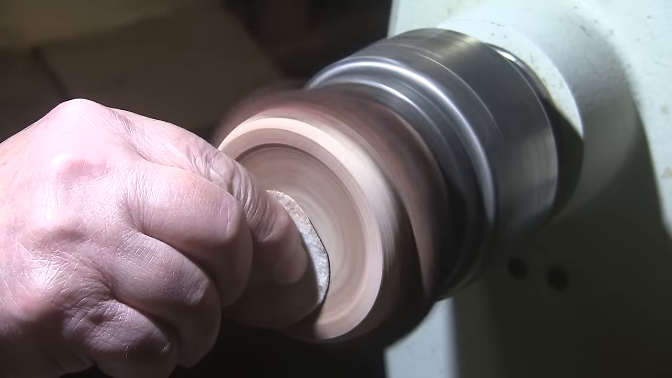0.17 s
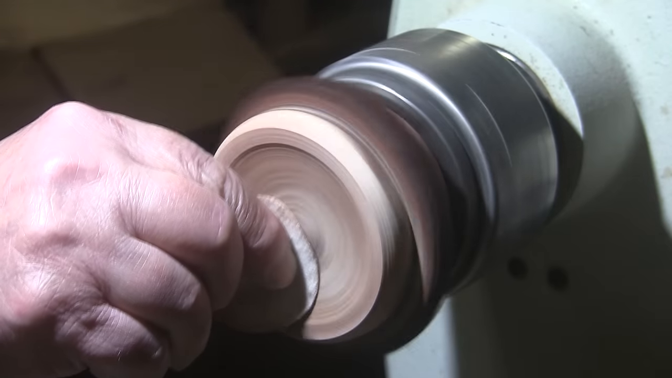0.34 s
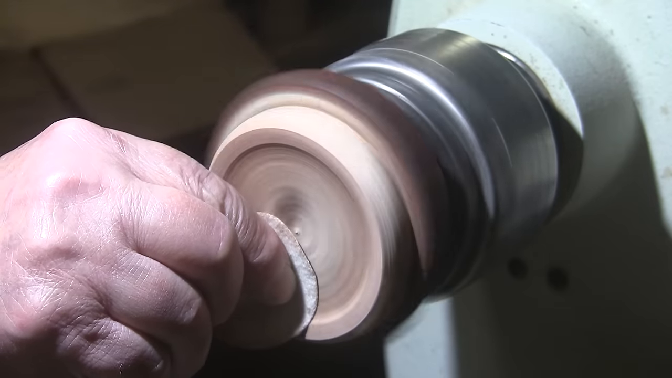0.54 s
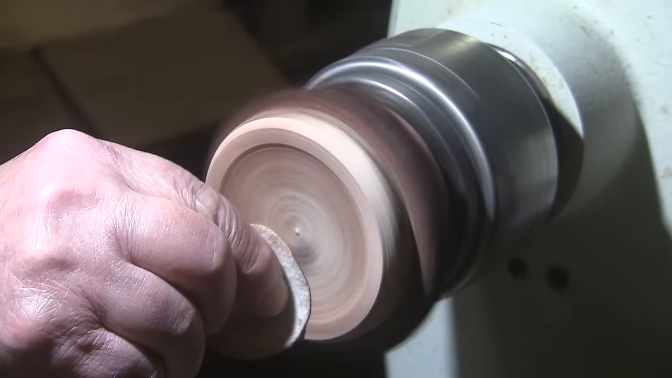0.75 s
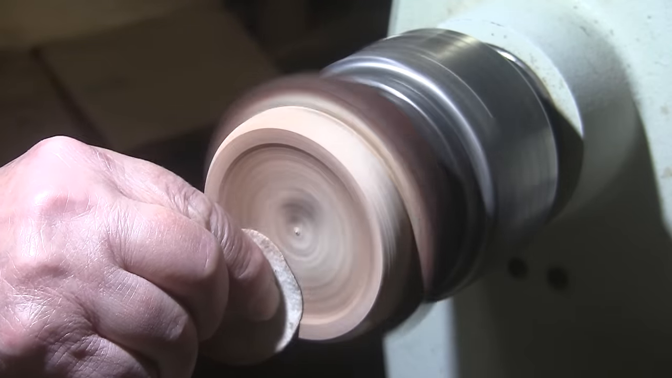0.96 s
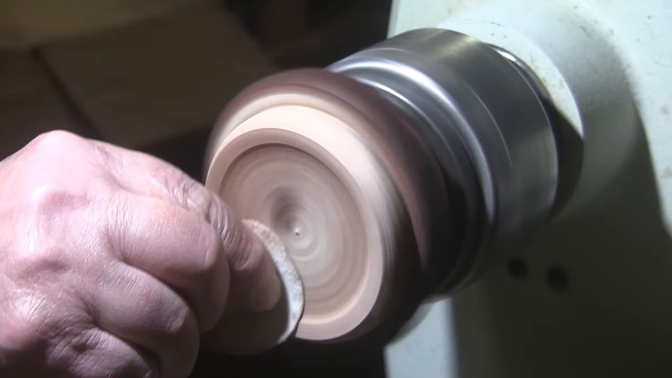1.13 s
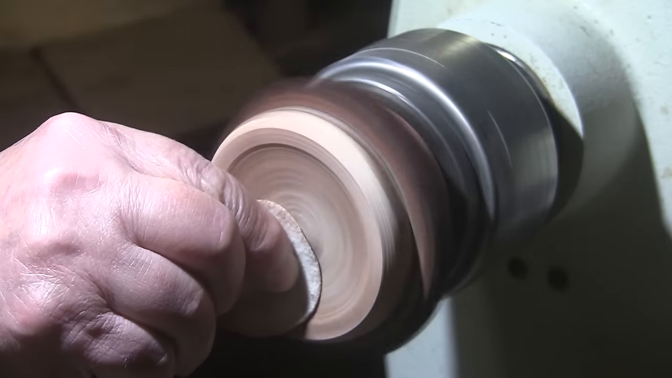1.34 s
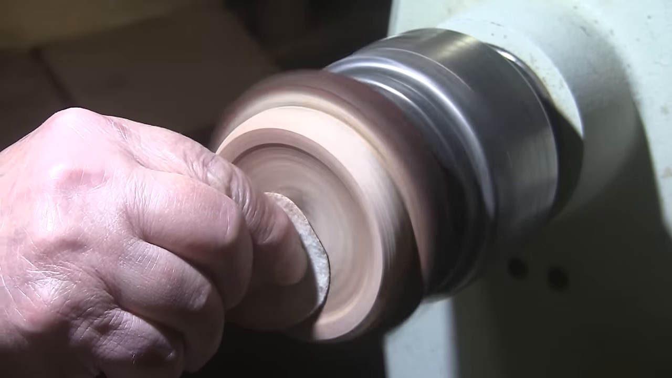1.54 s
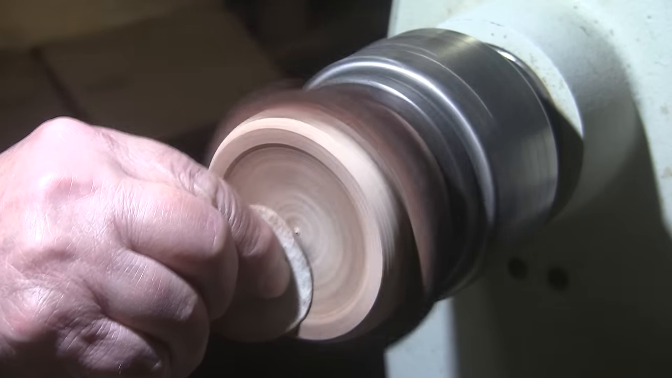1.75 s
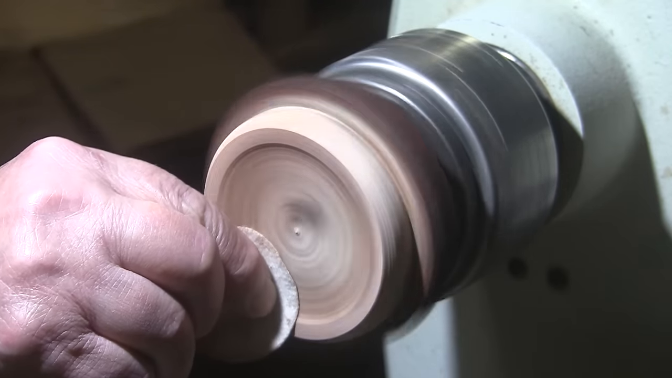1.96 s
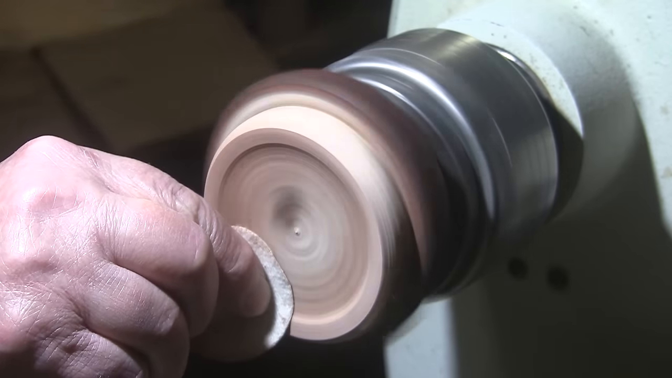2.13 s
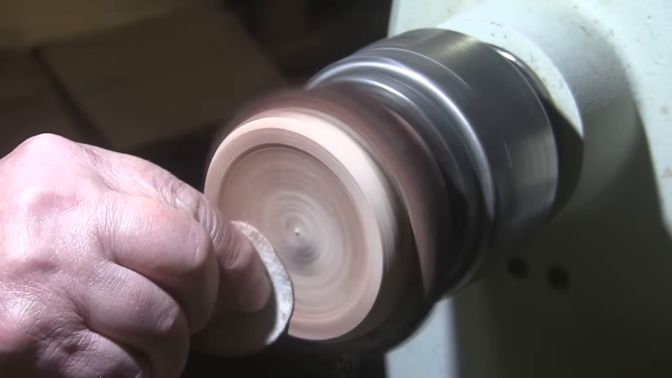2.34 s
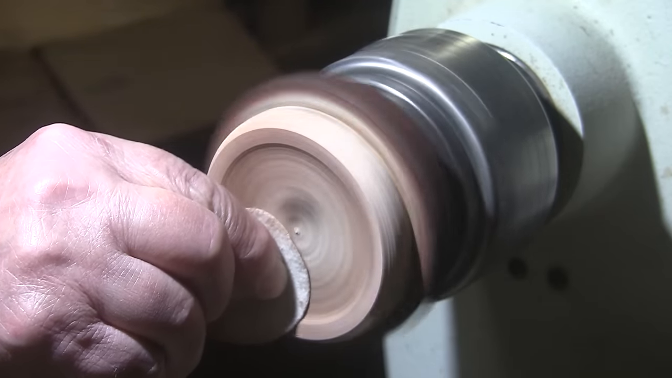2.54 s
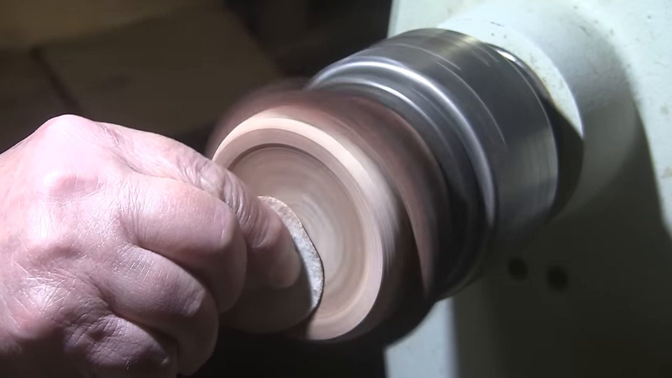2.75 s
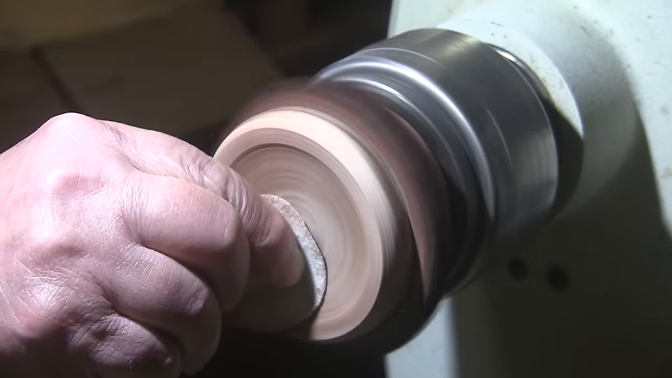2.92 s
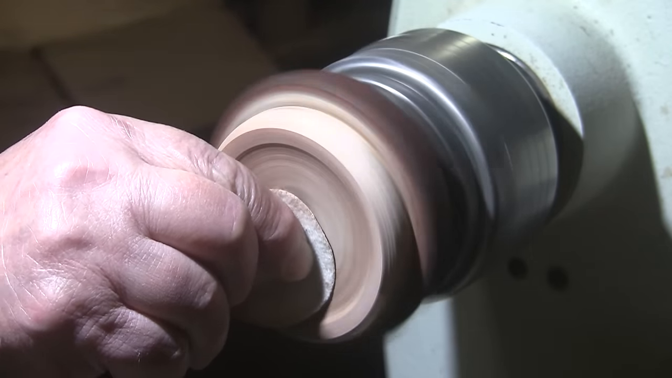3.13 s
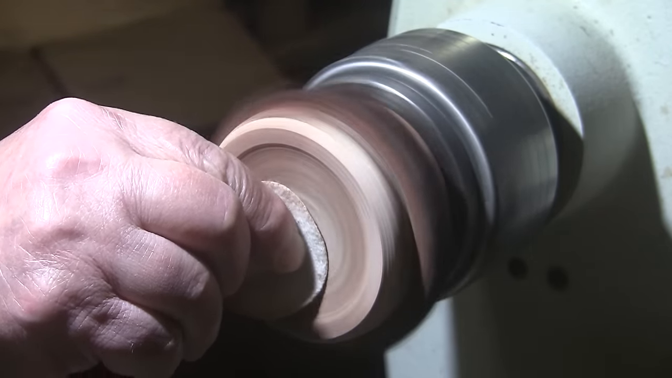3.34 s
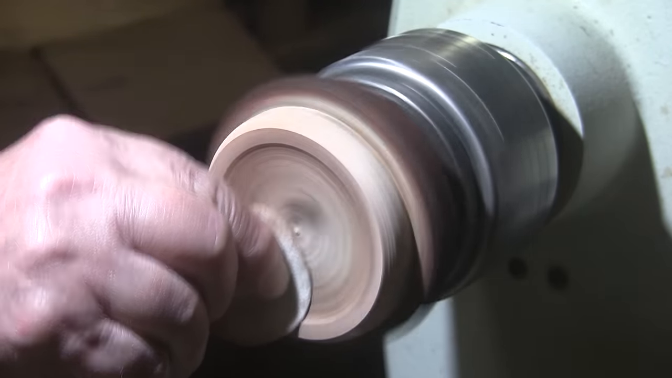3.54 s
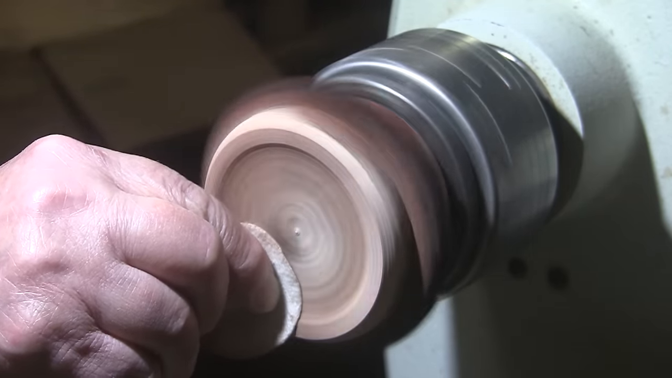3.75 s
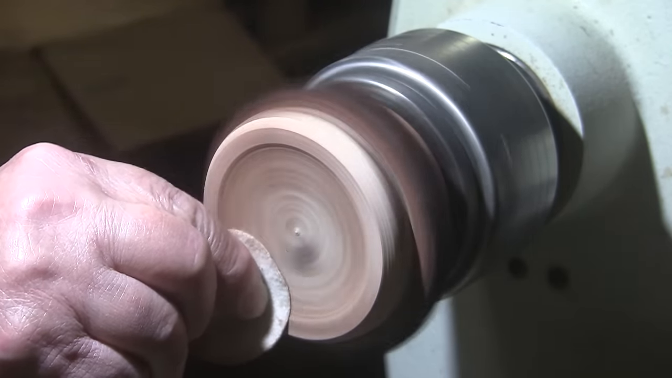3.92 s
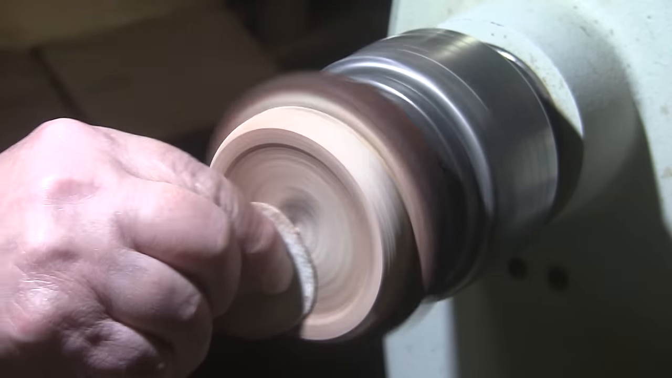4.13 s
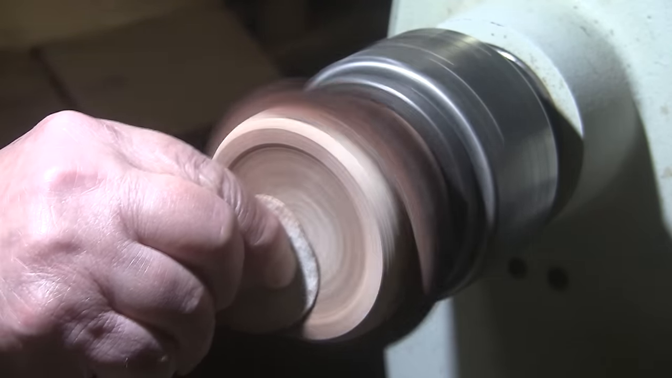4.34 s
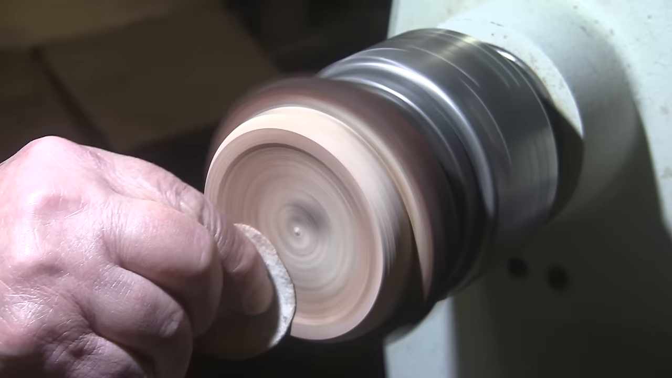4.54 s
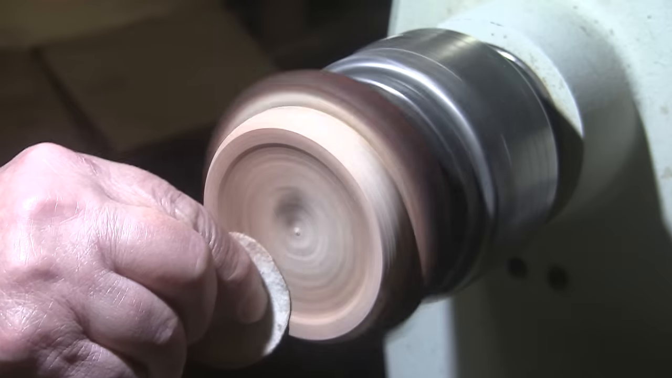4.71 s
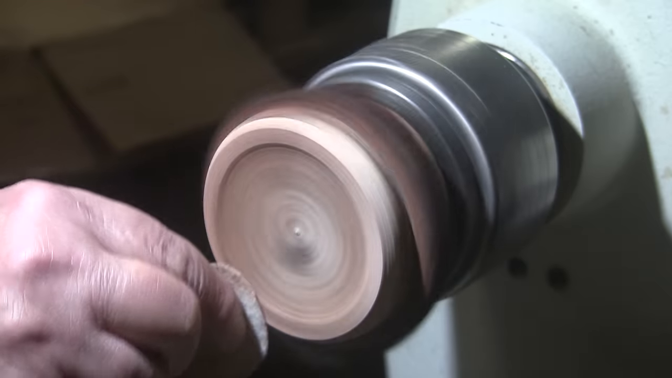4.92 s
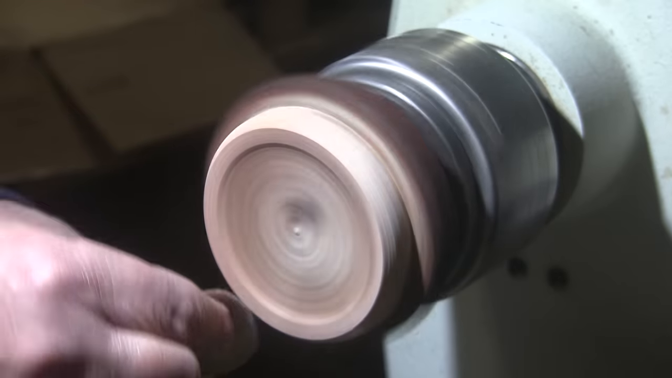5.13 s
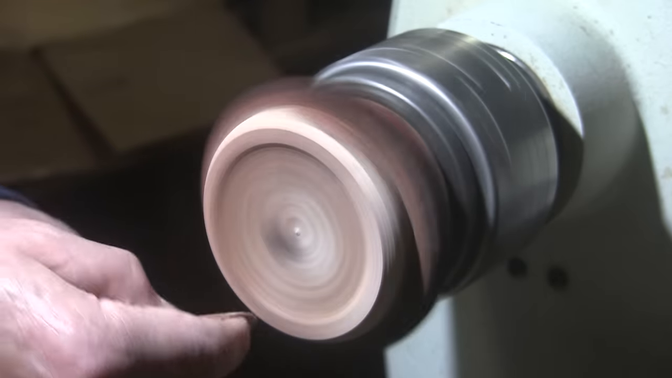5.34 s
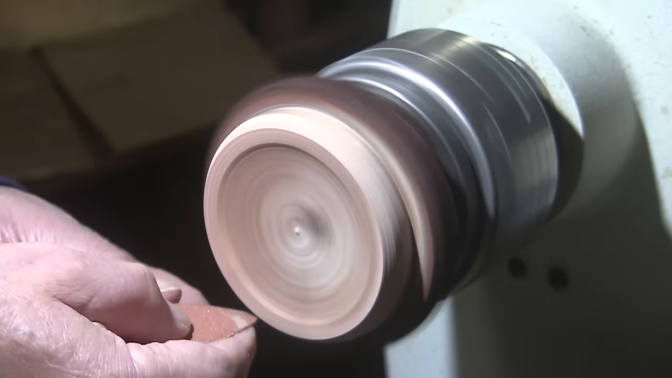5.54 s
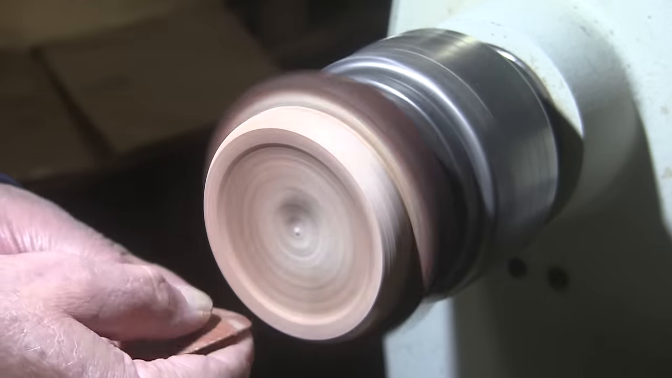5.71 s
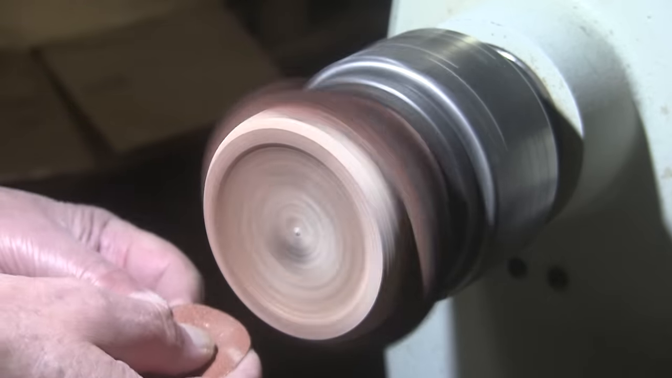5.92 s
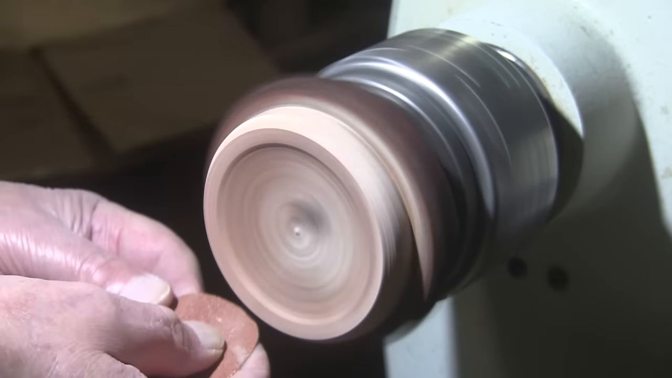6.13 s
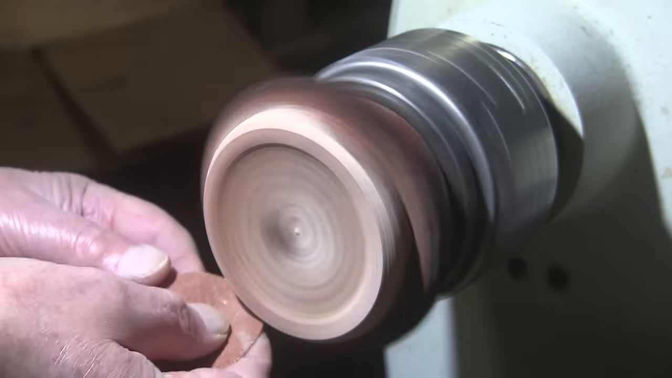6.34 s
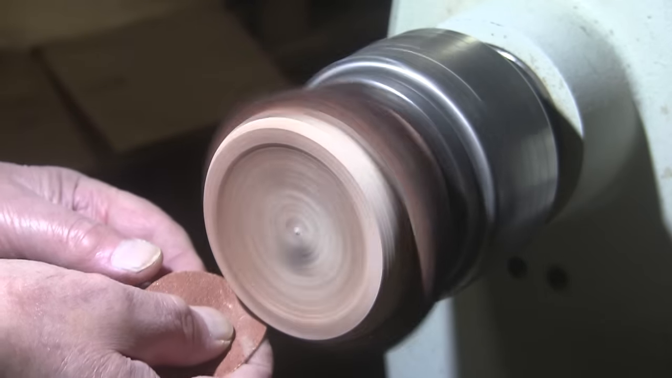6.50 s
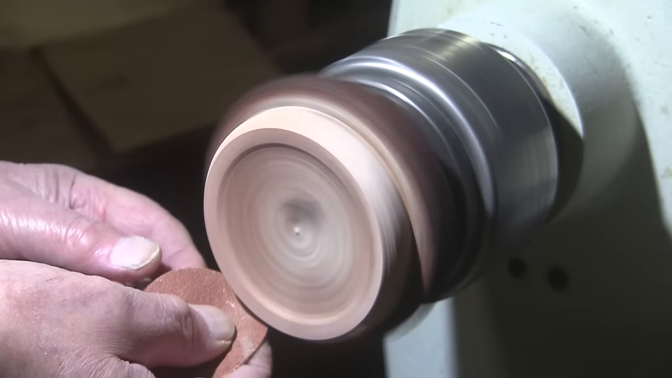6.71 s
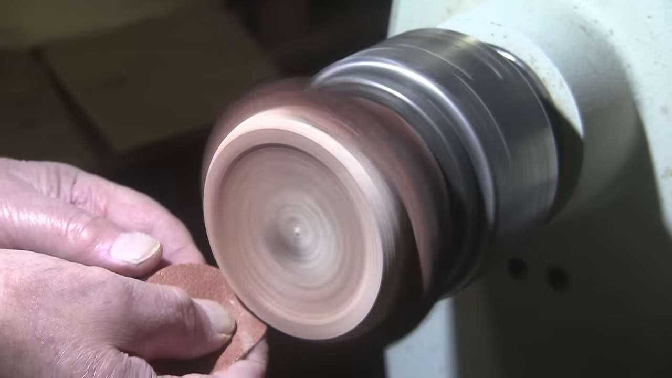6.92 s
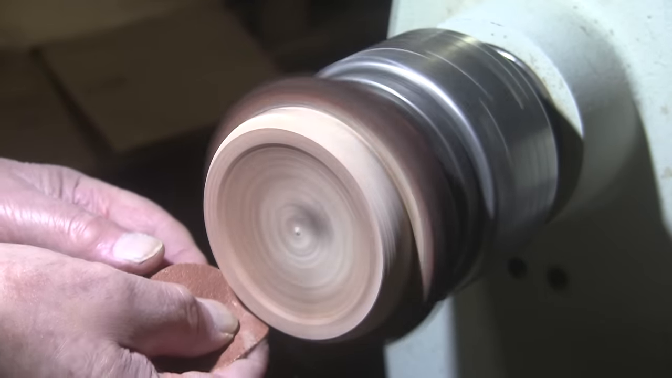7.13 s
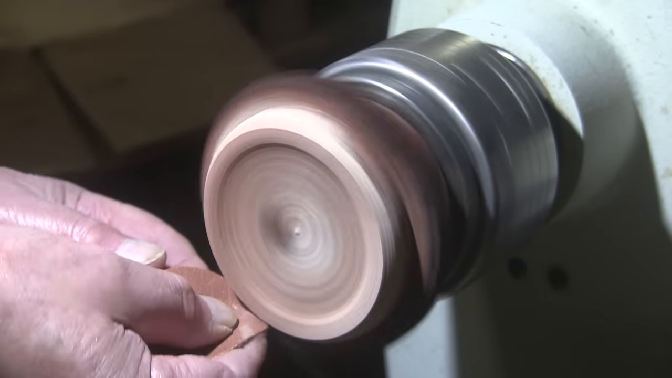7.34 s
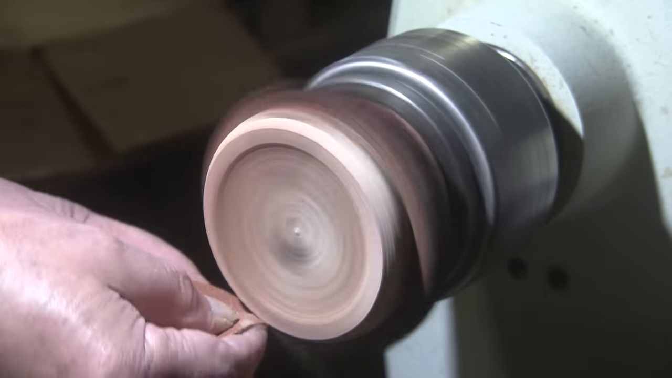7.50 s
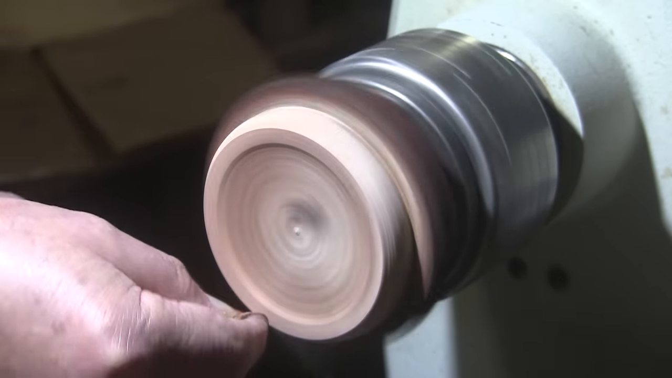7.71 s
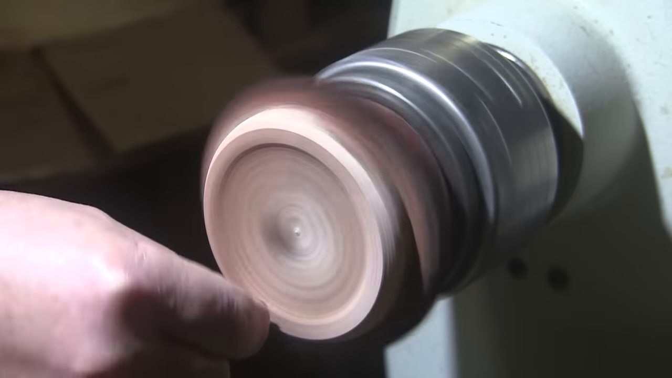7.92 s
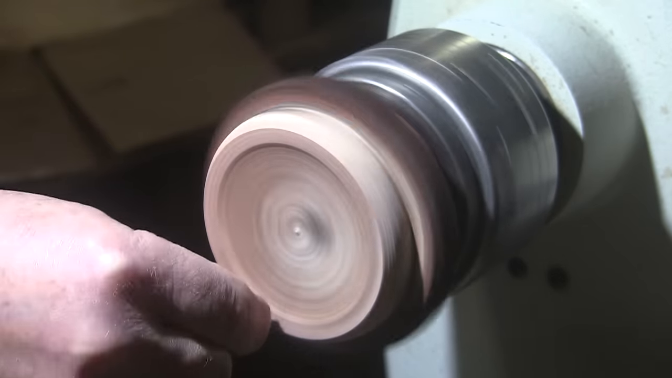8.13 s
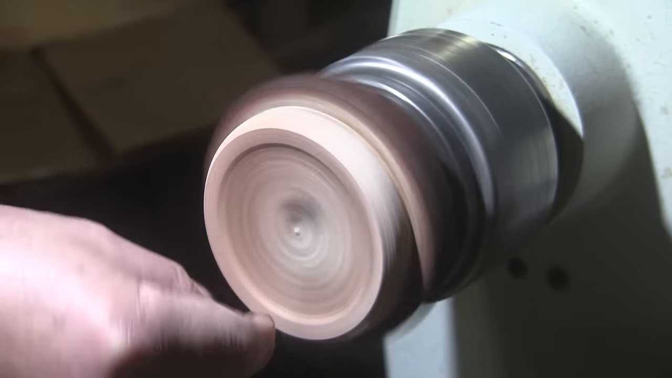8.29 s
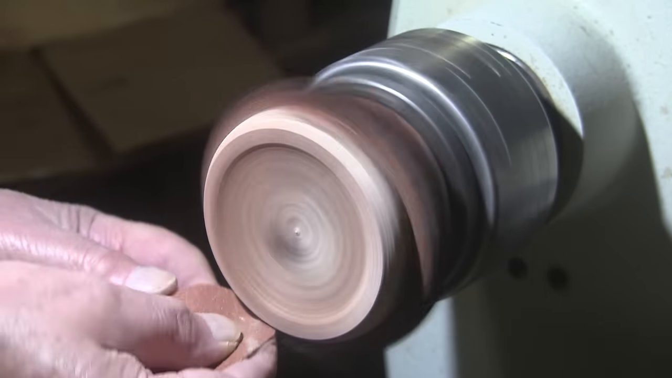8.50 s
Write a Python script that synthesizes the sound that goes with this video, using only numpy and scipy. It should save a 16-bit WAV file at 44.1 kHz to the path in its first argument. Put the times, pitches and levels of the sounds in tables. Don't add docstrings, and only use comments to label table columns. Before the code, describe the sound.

A dry, bright sanding hiss swells and chatters over a low lathe rumble, scattered small cracks tapping against the finger. It stops for just over a second, exposing the motor and a fast, faint ticking. The grit bites back in with strong scratches, then thins to a smoother, airy rub with evenly spaced light knocks. Heard very close, with short bench reflections, in a workshop.

```python
import sys
import numpy as np
from scipy import signal
from scipy.fft import rfft, irfft, next_fast_len
from scipy.io import wavfile
from scipy.ndimage import uniform_filter1d

SR = 44100
rng = np.random.default_rng(int(sys.argv[2]) if len(sys.argv) > 2 else 0)


def generate_wav(signal):
    frames = np.transpose(np.atleast_2d(signal))
    scaled = np.clip(frames, -1, 1) * 32767
    pcm = np.round(scaled).astype(np.int16)
    wavfile.write(sys.argv[1], SR, pcm)


def ratio_of_db(decibels):
    return 10 ** (np.asarray(decibels, float) / 20)


N = 377562
TIME = np.arange(N) / SR
HZ = np.fft.rfftfreq(next_fast_len(N), 1 / SR)

# pitch_hz, level_db
GRIT_COLOUR = [
    [(530, -41), (900, -22), (1200, -16), (2100, -10.5), (2320, -2.5), (2670, -6.5), (3050, -8), (3320, -6), (3970, -2), (4920, -4.5), (7570, -2), (13400, -5), (15700, -15)],
    [(530, -45), (900, -14), (1380, -13), (2030, -14), (2320, -11), (2670, -3.5), (4010, -8), (4370, -6), (10700, 0.5), (15700, -7)],
    [(530, -42), (900, -18), (1010, -17), (1740, -11), (2010, -10), (2320, -4), (3320, -4), (5610, -4), (9160, 1), (15700, -5.5)],
]
# pitch_hz, width_hz, level_db
BOWL_RINGS = [
    [(2067, 280, -7.5), (2720, 280, -4), (3350, 160, -0.5), (3570, 180, -2), (4020, 180, 1), (4590, 380, -2), (5446, 290, -1.5), (6170, 160, -6.5), (7020, 170, -4.5), (7620, 150, -3), (7820, 130, 1), (8480, 300, -5.5), (8900, 200, -12), (11400, 170, -4.5)],
    [(2016, 410, -4.5), (2650, 310, -5.5), (3310, 230, 0.5), (4040, 430, 0), (4930, 140, -1.5), (5800, 150, -3), (6330, 440, -1), (6890, 280, 2), (7630, 390, -2), (11060, 400, -6)],
    [(2010, 120, -4.5), (3380, 140, -2.5), (5080, 150, -4), (6510, 180, -1), (6930, 200, 0.5), (8000, 220, -10), (8730, 480, 0), (9450, 200, 1), (11300, 300, -1), (12300, 150, 0)],
]
# pitch_hz, width_hz, depth_0_to_1
NOTCHES = [
    [(2320, 72, 0.8), (3113, 86, 0.6), (3740, 70, 0.4), (4265, 80, 0.56), (4920, 90, .62), (5530, 70, .3), (5930, 90, 0.57), (6500, 70, 0.1), (7040, 80, .3), (7980, 200, 0.56), (9700, 110, 0.15), (10450, 150, 0.25)],
    [(2300, 80, .6), (3100, 90, 0.6), (3640, 90, .5), (5700, 60, .4), (6650, 70, 0.3), (7100, 120, 0.2), (9700, 90, 0.5), (12150, 150, 0.3)],
    [(2720, 90, 0.4), (3520, 82, 0.3), (4320, 74, 0.1), (6340, 80, 0.4), (7150, 200, .4), (10600, 200, 0.1)],
]
# pitch_hz, likeness_0_to_1
RUB_SAME = [(500, 0.86), (1400, 0.9), (3000, 0.98), (6000, 0.55), (9000, 0.34), (15000, 0.24)]
# pitch_hz, lean_db
RUB_LEAN = [(60, -3.0), (130, -3.5), (290, -3.5), (640, -6), (1410, -1.5), (3100, -3), (6000, -1),
            (8800, -6.5), (15000, -10)]
# pitch_hz, lead_radians
RUB_LEAD = [(3000, 0.1), (5000, 0.32), (7500, 0.5), (9500, 0.7), (11500, 1.6), (15500, 2.2)]
# delay_s, left_gain, right_gain
BENCH_ECHOES = [(0.00146, 0.15, -0.18), (0.000881, -0.49, 0.24), (.0023, -0.22, 0.32),
                (0.00016, 0.12, -0.026)]
# start_s, peak_db
CATCHES = [(0.1236, -12), (0.2728, -23), (.4, -17), (0.5526, -16), (0.8904, -3), (1.115, -9), (1.4147, 0),
           (1.5708, -8), (1.765, -8), (1.836, 2), (2.032, -8), (2.119, -14), (2.185, -10), (2.325, -12),
           (2.406, -13), (2.565, -4), (2.8556, -26), (3.562, -32), (3.74, -11), (3.7993, -19), (3.848, -19),
           (3.9529, -11), (4.293, -21), (4.437, -8), (4.49, -3), (4.564, -6), (4.628, -14), (4.656, -16),
           (4.771, -18), (4.8564, -8), (6.3849, -4), (6.4075, -4), (6.51, 2), (6.5904, -1), (6.6608, -27),
           (6.7371, -8), (6.788, 3), (6.865, 1), (6.928, -8), (6.949, -10), (7.002, -10), (7.024, -11),
           (7.0765, -6), (7.185, -7), (7.221, 1), (7.362, -6), (7.462, -10), (7.9783, -2), (8.0, 3),
           (8.03, -14), (8.47, -18)]
# middle_s, depth_db
SKIPS = [(0.221, 4), (.36, 2.5), (.8, 2), (2.055, 3.5), (2.2, 2), (2.38, 3), (3.09, 3), (3.925, 4.5),
         (4.27, 2.5), (4.585, 3.5), (4.757, 3), (4.82, 3.5), (6.375, 8), (6.43, 7.5), (6.575, 4),
         (6.705, 3), (6.845, 4), (6.975, 1), (6.993, 5), (7.06, 3.5), (7.67, 0), (7.93, 3), (8.13, 0),
         (8.25, 2.5)]
# time_s, place_turns
CONTACT = [(0, 0.93), (1.0, 0.76), (1.4, 1), (1.9, 0.59), (3.1, 0.97), (3.6, 0.65), (5, 0.71), (6.4, 0.18),
           (7.2, 0.28), (7.4, 1), (8.56, .62)]
# time_s, press_db, bright_db, grip_db
HOLLOW_STROKES = [
    [(0.0, -23.5, -2, -13.5), (0.096, -23.5, -4, -17), (0.33, -25, 0.5, -11), (0.812, -24.5, 6.5, -8.5),
     (1.072, -23, 2.5, -13.5), (1.154, -30, 5.5, -1.5), (1.21, -30, 3, -8), (1.414, -26, -5, -11.5),
     (1.66, -29.5, 2, -17)],
    [(1.7, -27, -0.5, -8), (1.904, -25.5, 6.5, -6), (2.174, -22.5, 3, -9.5), (2.468, -28.5, 7, -3.5),
     (2.538, -27, 2.5, -6.5), (3.336, -29, -4.5, -17), (3.4, -37, -5, -13), (3.46, -35, -2, -13)],
    [(3.49, -37, -2, -7), (3.564, -26.5, 5, -2), (3.974, -23, 3.5, -11), (4.036, -30, 6, -1),
     (4.25, -28, -3.5, -12.5), (4.516, -25, 5.5, -4), (4.68, -23.5, 4.5, -9), (4.962, -26.5, 6.5, -8.5),
     (5.06, -48.5, 12.5, 8)],
]
# time_s, press_db, bright_db, grip_db
LIFTED = [
    (5.07, -52, 5, -10),
    (5.16, -61, 3, -8),
    (6.305, -80, 0, -12),
]
# time_s, press_db, bright_db, grip_db
OUTER_STROKES = [
    [(6.32, -41, -26, -4), (6.338, -38.5, 2.5, -18), (6.402, -26, -4, -5.5), (6.826, -20, -3, -11.5),
     (6.914, -32, 12.5, -10), (6.962, -22, 3, -17), (7.0, -21.5, -1.5, -12)],
    [(7.05, -27, 5.6, -11), (7.108, -24.5, 2, -14), (7.214, -32, 9.8, -7), (7.318, -27.5, 3.9, -12.5),
     (8.31, -34.5, 8.3, -7.5), (8.5, -26, 7.9, -10.5), (8.56, -31, 15, -13)],
]
# time_s, rumble_db, hum_db
MOTOR_LEVELS = [(0.0, -41.5, -59), (0.07, -38, -48), (0.76, -39.5, -50), (1.02, -47, -70), (1.31, -38, -63),
                (2.07, -42, -53), (2.34, -43.5, -73), (2.48, -38.5, -51.5), (2.84, -39, -48),
                (3.15, -40, -59), (3.6, -39, -49.5), (4.03, -43.5, -56), (4.27, -40, -50),
                (6.39, -40.5, -52.5), (7.2, -40.5, -64), (7.46, -39, -44.5), (8.49, -38, -54),
                (8.56, -43, -51)]
# pitch_hz, level_db
RUMBLE_COLOUR = [(15, -49), (25, -20), (76, -5.5), (285, -9), (384, -4), (591, -9), (936, -4.5), (1040, -8),
                 (2760, -12.5), (2990, -14), (3340, -17.5), (6380, -20.5), (12500, -31.5), (14800, -39),
                 (16000, -40)]
# pitch_hz, width_hz, level_db
BED_RINGS = [(223.4, 8.5, -10.5), (245.6, 8.1, -7), (375.5, 23.4, 0.5), (406.4, 14, -3), (518, 19, -5.5),
             (656, 32, -8), (804, 17, -4.5), (872, 16, -3.5), (972, 10, -4), (1139, 17, -6), (1327, 53, -8),
             (1445, 15, -10), (2946, 50, -9)]
# pitch_hz, likeness_0_to_1
MACHINE_SAME = [(60, 0.96), (130, 0.88), (290, 0.89), (640, 0.87), (1400, 0.3), (3100, 0.14), (7000, 0.079),
                (15000, 0.081)]
# pitch_hz, lean_db
MACHINE_LEAN = [(60, -3), (180, -4.5), (550, -3.5), (1650, -3), (4970, 1), (15000, -15)]
# time_s, shift_hz
HUM_SAG = [
    (7.25, 0),
    (7.42, -3.5),
    (7.69, -4),
    (7.76, -1.4),
    (8.56, -1.5),
]
# start_s, peak_db, pitch_hz
FINGER_KNOCKS = [(0.408, -13, 2800), (0.544, -14, 3350), (0.696, -8.5, 2300), (0.612, -21, 2700),
                 (0.839, -13, 2606), (0.985, -19, 2700), (1.1166, -25, 2800), (1.845, -7.5, 2080),
                 (1.885, -19, 2600), (1.9054, -17, 2690), (2.106, -17, 2710), (2.245, -17, 2540),
                 (2.41, -11, 2500), (2.422, -15, 2300), (2.4364, -10.5, 2760), (2.553, -10.5, 2450),
                 (2.5712, -8.5, 3960), (2.7162, -17, 2650), (3.272, -22, 2800), (3.631, -17, 2810),
                 (3.72, -15, 2700), (3.851, -23, 2050), (3.915, -18, 2800), (4.4165, -12, 2010),
                 (4.4394, -11, 2180), (4.4897, -12, 2400), (4.563, -29, 2610), (4.709, -16, 2200),
                 (4.743, -15, 2600), (4.8569, -22, 2720), (6.3153, -23, 3730), (6.3295, -22, 3260),
                 (6.3518, -19, 3230), (6.3866, -13, 3200), (6.4097, -13, 3300), (6.444, -21, 2640),
                 (6.488, -14, 2930), (6.592, -11.5, 2760)]
# start_s, ring_db, edge_db
TICKS = [(5.079, -36, -46), (5.1354, -41, -49), (5.1771, -41, -48), (5.239, -38, -48), (5.2719, -36, -40),
         (5.3023, -37, -40), (5.3562, -33.5, -45), (5.3981, -37, -47), (5.439, -36, -50),
         (5.4804, -39, -48), (5.5196, -33, -45), (5.5742, -39, -49), (5.6042, -35, -42),
         (5.6473, -34.5, -48), (5.6884, -36, -39), (5.733, -34, -37), (5.7728, -39, -47),
         (5.8244, -42, -51), (5.8942, -28.5, -45), (5.9362, -34, -49), (5.9806, -35, -46),
         (6.0197, -33, -46), (6.0754, -43, -43), (6.1065, -41, -43), (6.1479, -40, -50), (6.1893, -37, -43),
         (6.2274, -39, -49), (6.2726, -41, -48)]
# pitch_hz, width_hz, level_db
GUARD_RINGS = [(2940, 60, -17), (3110, 110, -11), (3900, 380, -3.5), (1510, 330, -12), (5030, 5500, 15)]
# start_s, peak_db
RIM_KNOCKS = [(7.451, -15.5), (7.5954, -13), (7.7395, -12.5), (7.8844, -9.5), (8.029, -13.5), (8.1746, -14),
              (8.318, -13), (8.4632, -18)]
# pitch_hz, width_hz, level_db
RIM_RINGS = [(2010, 61, -11.5), (2050, 550, -5), (3200, 770, 4), (4200, 900, 4.5)]

TURNS_PER_S = 6.925


def evened(x):
    return x / np.sqrt(np.mean(x ** 2) + 1e-20)


def read(points, hz):
    f, value = np.transpose(points)
    return np.interp(np.log(hz + 1), np.log(f + 1), value)


def over_time(points):
    return np.interp(TIME, *np.transpose(points))


def waveform(spectrum):
    return irfft(spectrum, next_fast_len(N))[..., :N]


def filtered(x, gain):
    return waveform(rfft(x, next_fast_len(N)) * gain)


def colour(smooth, rings, smooth_db, rings_db):
    peaks = sum(ratio_of_db(db) ** 2 / (1 + (2 * (HZ - f) / w) ** 2) ** 2 for f, w, db in rings)
    floor = ratio_of_db(read(smooth, HZ) + smooth_db) ** 2
    return np.sqrt(floor + ratio_of_db(rings_db) ** 2 * peaks)


def wander(slow_hz, fast_hz):
    gain = (HZ > slow_hz) / (1 + (HZ / fast_hz) ** 2)
    return evened(filtered(rng.standard_normal(N), gain))


def pair(x, same, lean):
    a, b = rfft(x, next_fast_len(N))
    alike = np.clip(read(same, HZ), 0, 1)
    ports = np.array([a, alike * a + np.sqrt(1 - alike ** 2) * b])
    return ports * ratio_of_db(np.outer([.5, -.5], read(lean, HZ)))


def patchy(x, patch_db, size, bins, frames):
    z = signal.stft(x, nperseg=size)[2]
    field = uniform_filter1d(rng.standard_normal(z.shape[1:]), bins, 0)
    field = uniform_filter1d(field, frames, 1)
    return signal.istft(z * ratio_of_db(patch_db * evened(field)), nperseg=size)[1][:, :N]


def burst(rings, body_db, edge_db, rise, fall):
    t = np.arange(1500) / SR
    fade = np.exp(-t / fall) + 0.16 * np.exp(-t / 0.026)
    puff = rng.standard_normal((2, len(t))) * (1 - np.exp(-t / rise)) * fade
    puff[1] = 0.63 * puff[0] + .5 * puff[1]
    modes = sum(ratio_of_db(db) * np.exp(-np.pi * w * t) * np.sin(2 * np.pi * f * t) for f, w, db in rings)
    body = signal.fftconvolve(puff, modes[None], axes=1)[:, :len(t)]
    edge = signal.lfilter(*signal.butter(2, (2600 * 2 / SR, 13500 * 2 / SR), "band"), puff)
    return ratio_of_db(body_db) * body / abs(body).max() + ratio_of_db(edge_db) * edge / abs(edge).max()


def add(mix, s, sound):
    part = mix[:, round(s * SR):][:, :sound.shape[1]]
    part += sound[:, :part.shape[1]]


def rough_spot():
    angle = 2 * np.pi * (TURNS_PER_S * TIME - over_time(CONTACT))
    return np.exp(4 * (np.cos(angle) - 1)) + 0.12 * np.exp(5.7 * (-np.cos(angle) - 1))


def paper_jerks():
    start_s, peak_db = np.transpose(CATCHES)
    jerks_db = np.zeros(N)
    jerks_db[(start_s * SR).astype(int)] = np.clip(0.24 * (peak_db + 26), 0, 8)
    jerks_db = signal.lfilter([1], [1, -np.exp(-1 / (0.01 * SR))], jerks_db)
    return jerks_db - sum(db * np.exp(-((TIME - s) / 0.021) ** 2) for s, db in SKIPS)


def grit_scratches():
    grit = ratio_of_db(2.7 * np.minimum(rng.exponential(1, N), 4))
    chatter = ratio_of_db(0.72 * wander(5.1, 36) + 0.41 * wander(23, 170) + paper_jerks())
    scratch = pair(rng.standard_normal((2, N)) * grit * chatter, RUB_SAME, RUB_LEAN)
    echoes = 1
    for delay, *gains in BENCH_ECHOES:
        echo = np.exp(-2j * np.pi * HZ * delay - (HZ * delay / 14) ** 2)
        echoes = echoes + np.outer(gains, echo)
    scratch *= echoes
    scratch[0] *= np.exp(1j * read(RUB_LEAD, HZ))
    return scratch


def sanding():
    scratch, spot = grit_scratches(), rough_spot()
    strokes = np.vstack([*HOLLOW_STROKES, LIFTED, *OUTER_STROKES]).T
    press_db, bright_db, grip_db = [np.interp(TIME, strokes[0], column) for column in strokes[1:]]
    to_wall = np.clip((TIME - 6.1) / 0.35, 0, 1)
    to_rim = np.clip((TIME - 6.95) / 0.71, 0, 1)
    shares = 1 - to_wall, to_wall - to_rim, to_rim
    throb = spot * (1 + 0.31 * to_wall - 1.35 * to_rim)

    low = 1 / (1 + (HZ / 3150) ** 30)
    high = 1 / (1 + (6000 / (HZ + 1)) ** 8)
    bands = [(low, press_db - 1 + grip_db, 3.5),
             (1 - low - high, press_db - .8, 3.2),
             (high, press_db + bright_db - .4, 1.8)]
    out = 0
    for smooth, rings, notches, share in zip(GRIT_COLOUR, BOWL_RINGS, NOTCHES, shares):
        tone = colour(smooth, rings, smooth_db=-3.5, rings_db=-1.5)
        for f, w, depth in notches:
            tone = tone * (1 - min(depth, 1) / (1 + (2 * (HZ - f) / w) ** 2))
        for band, level_db, throb_db in bands:
            part = waveform(scratch * (tone * np.sqrt(abs(band))))
            out = out + np.sqrt(share) * ratio_of_db(level_db + throb_db * throb) * evened(part)
    out = patchy(out, 1.3, size=512, bins=3, frames=30)
    return ratio_of_db(-0.17) * patchy(out, 1.34, size=128, bins=3, frames=8)


def machine_noise():
    return pair(rng.standard_normal((2, N)), MACHINE_SAME, MACHINE_LEAN)


def motor_rumble():
    tone = colour(RUMBLE_COLOUR, BED_RINGS, smooth_db=-2.0, rings_db=3.0)
    tone = tone / (1 + (38 / (HZ + 1)) ** 4)
    rumble = patchy(evened(waveform(machine_noise() * tone)), 0.6, size=256, bins=4, frames=10)
    s, rumble_db, _ = np.transpose(MOTOR_LEVELS)
    beat_db = 0.066 * np.cos(2 * np.pi * (TURNS_PER_S * TIME - .3))
    bump_db = 8 * np.exp(-((TIME - 6.62) / 0.041) ** 2)
    return rumble * ratio_of_db(np.interp(TIME, s, rumble_db) + beat_db + bump_db + 1.74)


def motor_hum():
    s, _, hum_db = np.transpose(MOTOR_LEVELS)
    pitch_hz = 76.2 + over_time(HUM_SAG) + 0.4 * wander(.2, 3.9)
    hum = np.sqrt(2) * np.sin(2 * np.pi * np.cumsum(pitch_hz) / SR)
    return hum * ratio_of_db([[-1.8], [1.8]]) * ratio_of_db(np.interp(TIME, s, hum_db) - 2.5)


def controller_hiss():
    band = 1 / (1 + (2 * (HZ - 15000) / 1000) ** 4)
    return ratio_of_db(-49.5) * evened(waveform(machine_noise() * band))


def without_bass(x):
    return filtered(x, 1 / (1 + (1300 / (HZ + 1)) ** 6))


def finger_knocks():
    out = np.zeros((2, N))
    for s, db, hz in FINGER_KNOCKS:
        rings = [(hz, 400, 0), (2030, 140, -7.5), (1750, 500, -6), (3600, 1800, 9.0)]
        add(out, s, burst(rings, db + 0.67, db - 30, rise=0.00044, fall=0.002))
    return without_bass(out)


def belt_ticks():
    out = np.zeros((2, N))
    for s, ring_db, edge_db in TICKS:
        add(out, s, burst(GUARD_RINGS, ring_db + 6.0, edge_db + 8, rise=0.0009, fall=0.006))
    return out * ratio_of_db([[-.8], [.8]])


def rim_knocks():
    out = np.zeros((2, N))
    for s, db in RIM_KNOCKS:
        for late_s, bounce_db in (0, 0), (.017, -7):
            peak_db = db + bounce_db + 0.49
            add(out, s + late_s, burst(RIM_RINGS, peak_db, db - 28, rise=0.00074, fall=0.0025))
    return without_bass(out)


def scene():
    machine = motor_rumble() + motor_hum() + controller_hiss()
    return sanding() + machine + finger_knocks() + belt_ticks() + rim_knocks()


def top_cut(x):
    return signal.sosfilt(signal.butter(12, 15960, fs=SR, output="sos"), x)


def record(dry):
    limited = 0.97 * np.tanh(dry / 0.88)
    mix = filtered(limited, 1 / (1 + (HZ / 15800) ** 900))
    return top_cut(mix)


dry = scene()
out = record(dry)
generate_wav(out)
```